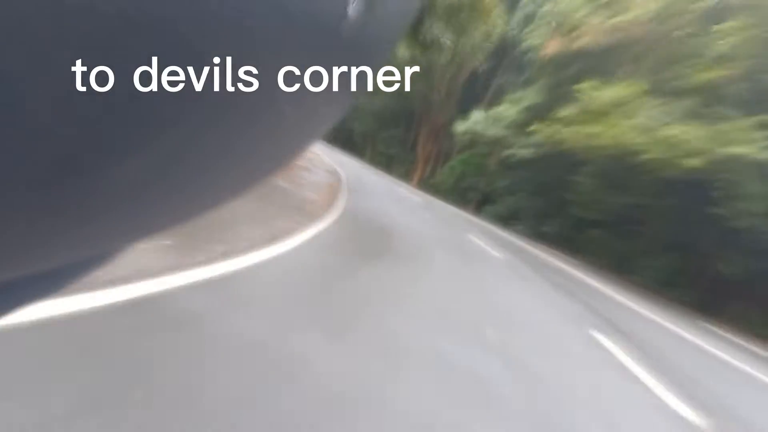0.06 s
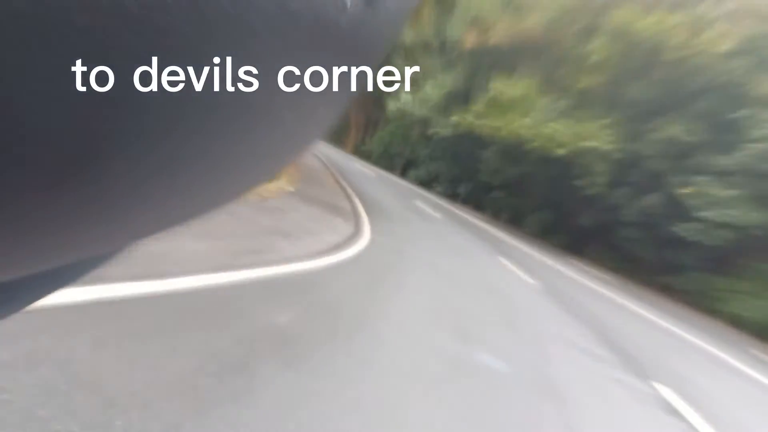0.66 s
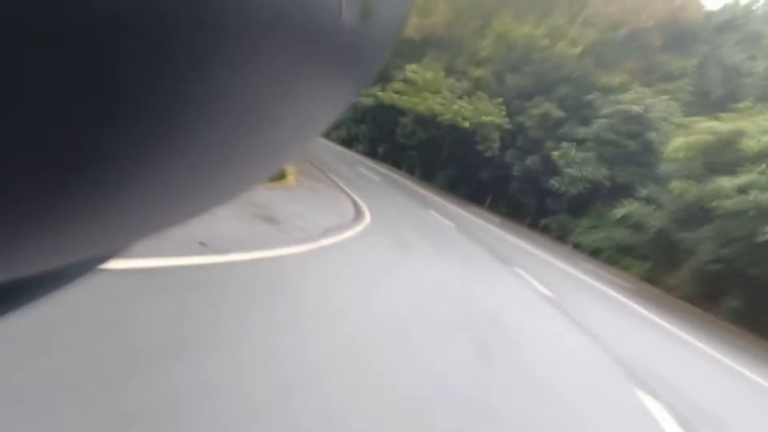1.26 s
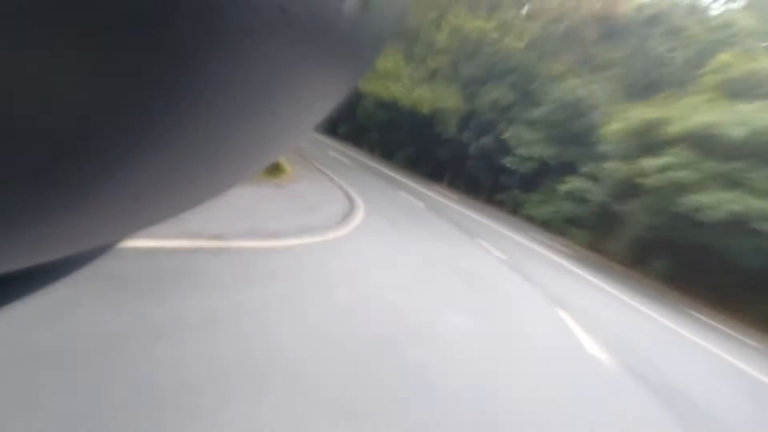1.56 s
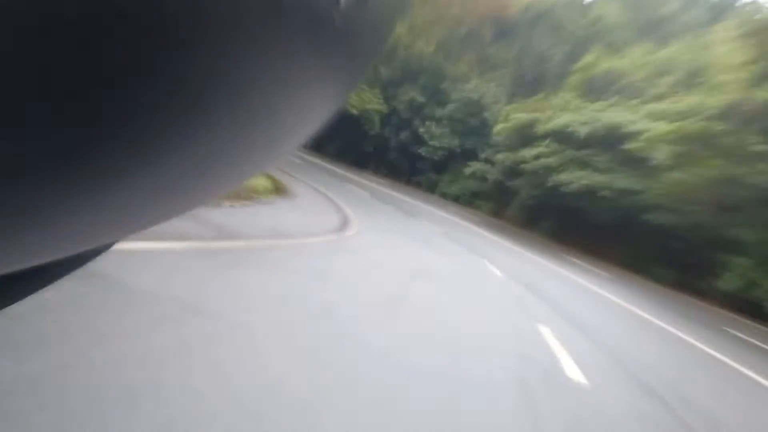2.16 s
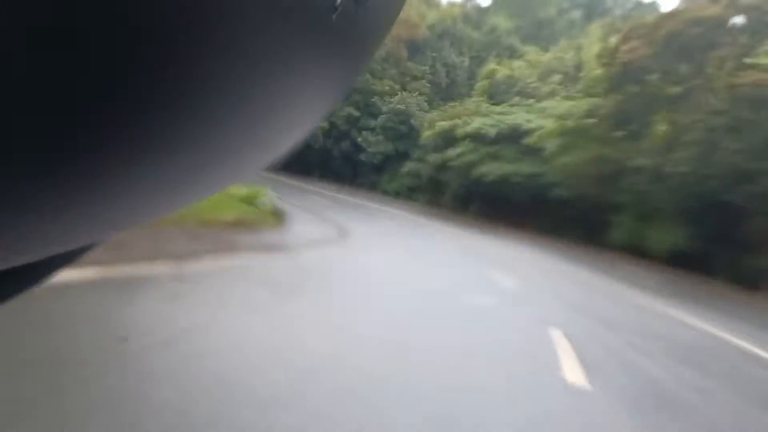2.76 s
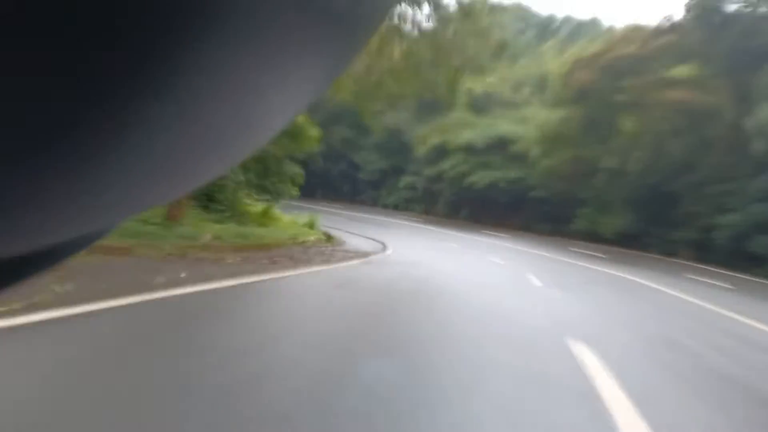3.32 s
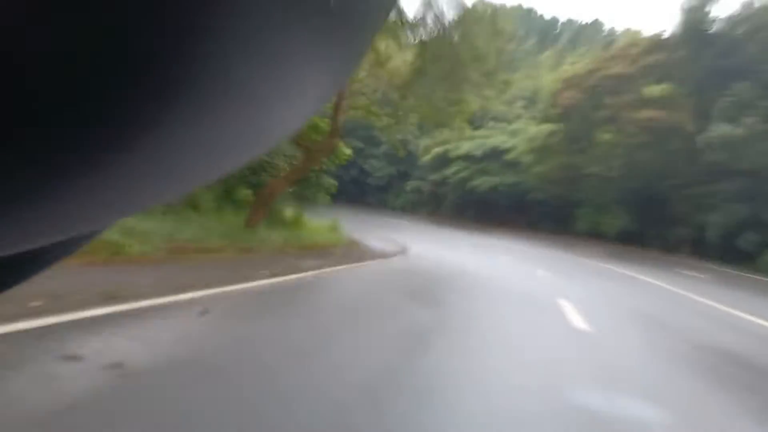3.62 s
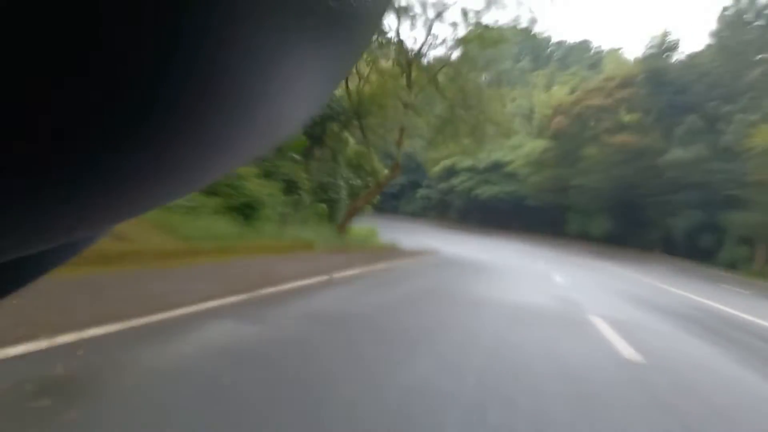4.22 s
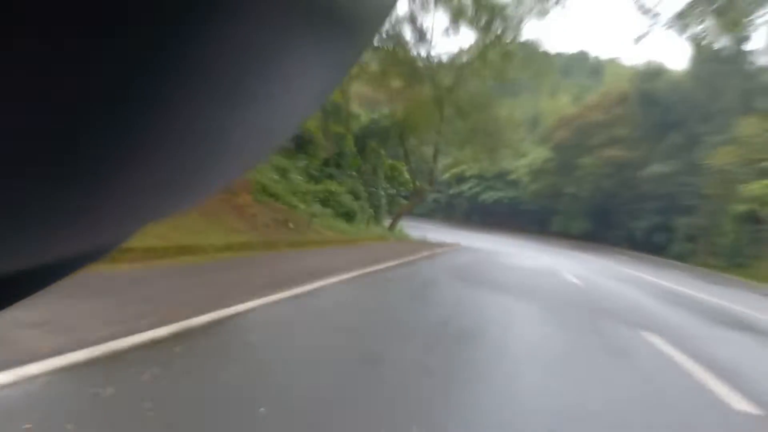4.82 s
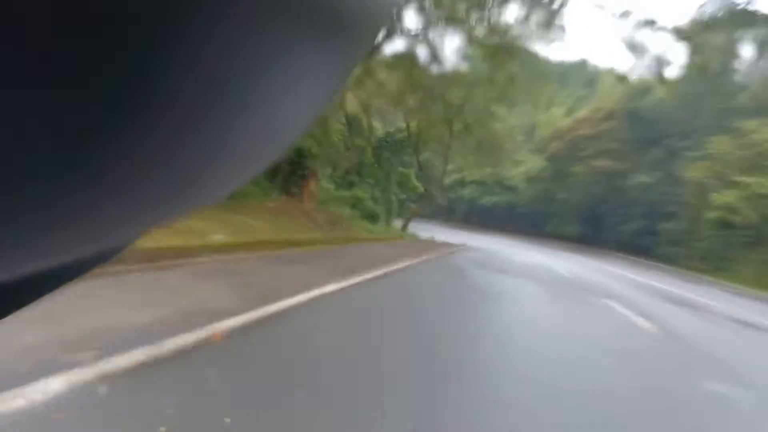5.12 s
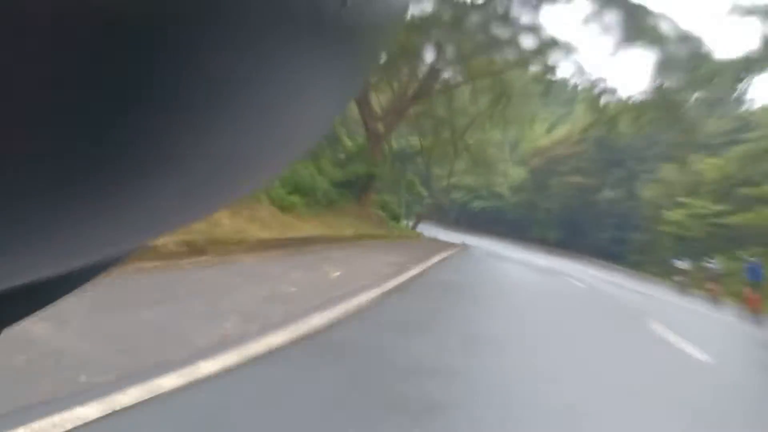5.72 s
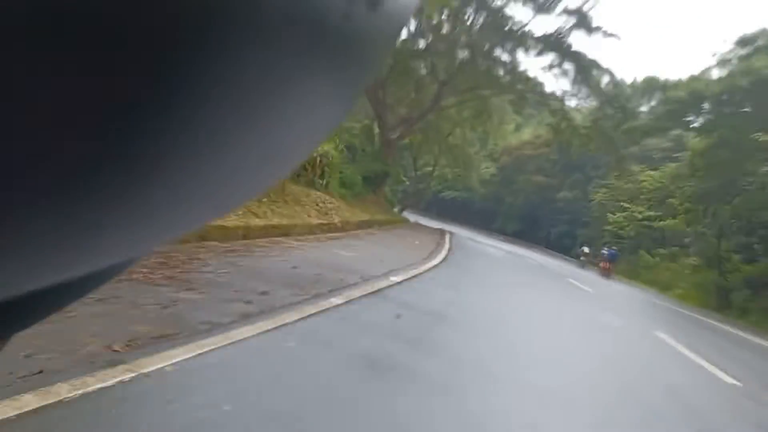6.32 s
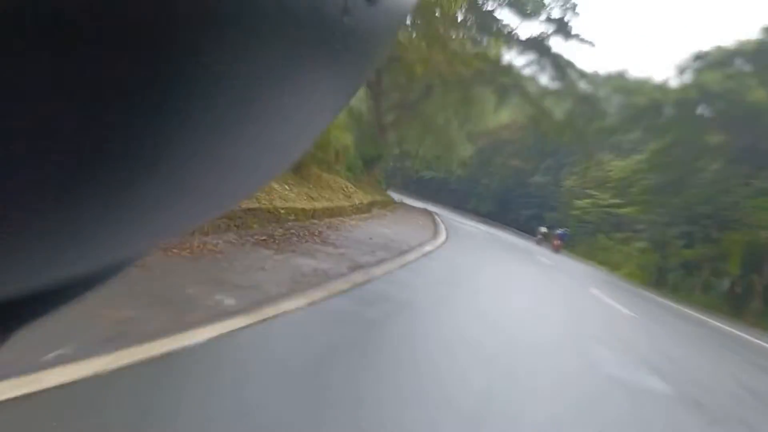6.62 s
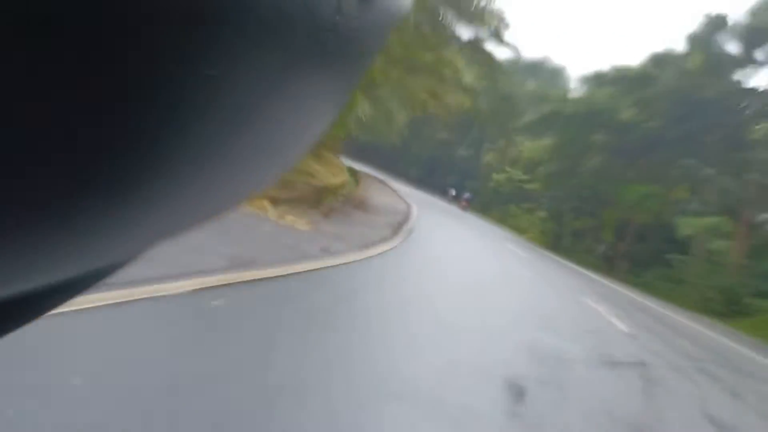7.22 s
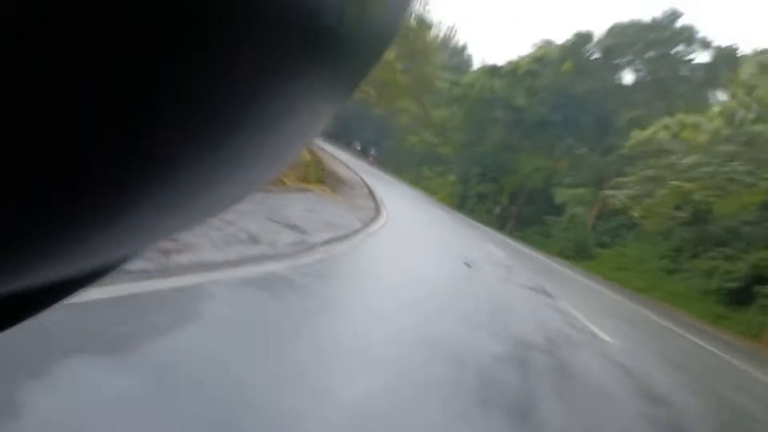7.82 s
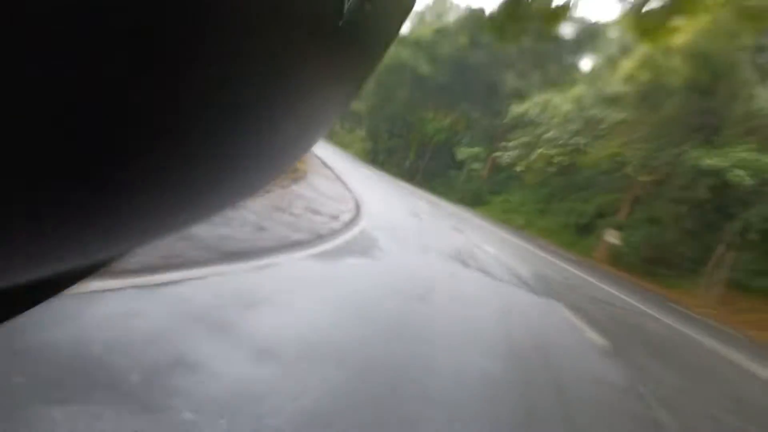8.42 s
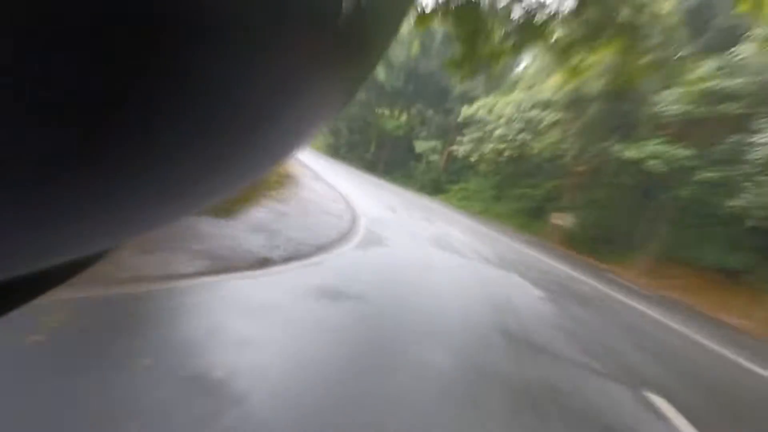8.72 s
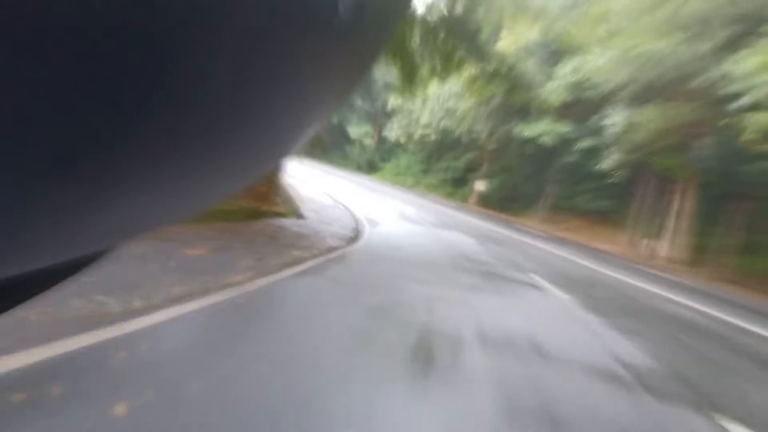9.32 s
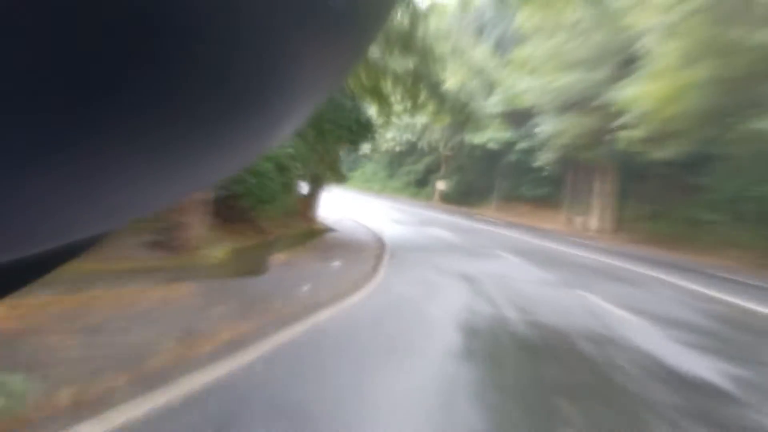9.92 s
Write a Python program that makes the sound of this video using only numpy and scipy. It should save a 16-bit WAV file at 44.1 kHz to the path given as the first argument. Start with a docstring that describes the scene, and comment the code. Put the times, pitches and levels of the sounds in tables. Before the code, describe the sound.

Gusting wind thumps and sputters on the microphone of a moving motorcycle, over a faint engine drone, chain whir and wet tyre hiss.

```python
"""Gusting wind thumps and sputters on two microphone ports, low on a motorcycle in wet bends.
Turbulent air buffets each port, rushes over the bodywork and rings a hollow of the housing;
single eddies slap, blurt and spit. Under it the exhaust drones on multiples of the engine cycle,
chain links whir on the sprocket and the tyres hiss with spray. Late on the revs drop briefly."""
import sys
import numpy as np
from scipy import signal
from scipy.fft import rfft, irfft, next_fast_len
from scipy.io import wavfile
from scipy.ndimage import uniform_filter1d

SR = 44100
rng = np.random.default_rng(int(sys.argv[2]) if len(sys.argv) > 2 else 0)


def waveform_to_disk(signal):
    """Save audio, clipped to [-1, 1], as 16-bit WAV at the path in sys.argv[1]."""
    frames = np.transpose(np.atleast_2d(signal))
    scaled = np.clip(frames, -1, 1) * 32767
    samples = np.round(scaled).astype(np.int16)
    wavfile.write(sys.argv[1], SR, samples)


N = 439677

# Spectral shapes: freq_hz, density_db
BUFFET_SPECTRUM = [(20, -6), (45, -17), (72, -6), (118, 0.5), (178, -3.5), (235, -1.5), (300, -4),
                   (420, -12.5), (800, -12), (3000, -86.5)]
SPUTTER_SPECTRUM = [(150, -12), (300, -8), (600, -2), (930, -4), (1130, 1.5), (1340, -0.5), (1600, -6),
                    (2200, -12), (3200, -19), (10000, -50)]
RUSH_SPECTRUM = [(100, -35), (280, 5.5), (600, -2), (950, -3.5), (1170, 5.5), (1480, -0.5), (1720, 2),
                 (2500, -4.5), (3700, -10), (5000, -10.5), (8000, -50)]
CHAIN_SPECTRUM = [(2500, -28), (4000, -10.5), (5800, -7.5), (6900, -9), (7550, -16), (8100, -3),
                  (8750, -18.5), (9200, -25), (11500, -24)]
SPRAY_SPECTRUM = [(1500, -8), (3300, 10), (5500, 0.5), (7000, 5.5), (8000, -3.5), (10200, 0), (11200, 5),
                  (14400, 2), (15500, -9.5)]
SLAP_SPECTRUM = [(150, -15), (350, -12), (700, -7.5), (1150, 4), (1380, 2.5), (1700, -6), (2400, -12.5),
                 (3500, -17), (10000, -51)]
SPIT_SPECTRUM = [(600, -18), (1500, 5), (2500, -4), (3600, -6), (8000, -40)]
# Deepest band of the buffeting: time_s, gain_db
DEEP_GAIN = [(0, 0), (1.2, 0), (2.4, 1), (3.3, -0.5), (4.6, 5.5), (5.8, -0.5), (6.6, 3.5), (8.5, 0),
             (9.97, 3)]
# Boom band of the buffeting: time_s, gain_db
BOOM_GAIN = [(0, -2.5), (1.2, -2), (2.6, 0.5), (4, -1.5), (5.5, 2.5), (6.6, 3), (7.5, -0.5), (8.6, 2.5),
             (9.97, -0.5)]
# Puffs of air on the ports: peak_s, buffet_rise_db, sputter_rise_db
PUFFS = [(0.207, 16, 7.5), (0.297, 11, 4), (0.327, 13.5, 4), (0.547, 10, 6), (0.591, 11, 6.5),
         (0.661, 6, 6), (0.74, 12.5, 6), (0.827, 12.5, 1), (0.861, 15.5, 5.5), (0.948, 5, 4),
         (1.004, 12, 6.5), (1.034, 10.0, 3), (1.229, 13, 6), (1.282, 12, 7), (1.341, 9.5, 3),
         (1.414, 13, 1), (1.487, 10, 5.5), (1.543, 4, 7.5), (1.606, 13.5, 12), (1.733, 11.5, 10.5),
         (1.986, 10.5, 3.5), (2.158, 2, 9), (2.36, 12, 6), (2.411, 10.5, 2), (2.576, 4, 7.5),
         (2.693, 11.5, 7.5), (2.789, 12, 5), (2.867, 2, 8), (2.947, 11, 4.5), (2.987, 6, 5.5),
         (3.028, 6, -2), (3.108, 8.5, 2), (3.251, 10.5, -2), (3.48, 7.5, 9.5), (3.542, 7, 4.5),
         (3.617, 12.5, 9.5), (3.651, 16.5, 8), (3.716, 5, 5.5), (3.957, 6, 9.5), (3.999, 10.5, 6),
         (4.028, 12.5, 11.5), (4.056, 8, 9), (4.097, 10.5, 8.5), (4.145, 9, 6.5), (4.214, 13, 8.5),
         (4.314, 13, 0), (4.536, 9, 0), (4.569, 12.5, 4), (4.766, 11.5, -3), (4.894, 12.5, 4),
         (5.026, 12, 1), (5.07, 1, 7.5), (5.106, 11, 6), (5.147, 12, 4.5), (5.23, 12, 2), (5.268, 13, 3),
         (5.383, 7, 5), (5.44, 8.5, 4), (5.475, 8, 6), (5.527, 14, 9), (5.559, 13.5, 7.5), (5.611, 15, 2),
         (5.661, 10, 7.5), (5.728, 10.5, 7.5), (5.854, 12, -1), (5.886, 11, 2), (6.02, 9, 3),
         (6.296, 11.5, 8.5), (6.338, 12, 2), (6.372, 13.5, 7), (6.472, 7, -1), (6.538, 1, 8),
         (6.572, 9.5, 2), (6.658, 10, 2), (6.752, -4, 8.5), (6.841, 12, 6), (6.916, 13.5, 13.5),
         (7.033, 7, 3), (7.301, 13.5, 7.5), (7.343, 14.5, 6.5), (7.45, 14.5, -1), (7.483, 13, 5),
         (7.529, 2, 7), (7.565, 12, 1.0), (7.691, 15, 4.5), (7.787, 9, 8), (7.881, 3.0, 4), (7.945, -3, 0),
         (7.986, 13, 11.5), (8.114, 6, 8), (8.262, 12, 7), (8.326, 8, -5), (8.471, 8, 8.5),
         (8.512, 15.5, 8), (8.589, 15.5, 5.5), (8.643, 9, 3), (8.675, 9, 6.5), (8.71, 12, 6.5),
         (8.837, 8, 7), (8.864, 13, 0), (8.925, 6, 4.5), (8.954, 8, 8.5), (9.352, 6, 6.5), (9.401, 8, 8.5),
         (9.496, 17, 7.5), (9.553, 18, 7), (9.612, 18, 4), (9.65, 7, 5), (9.703, 8, 5), (9.828, 9, 4)]
# Lulls in the wind: centre_s, length_s, drop_db
LULLS = [(0.484, 0.027, 13), (4.119, .03, 9), (4.665, 0.081, 5), (6.265, .03, 10), (7.112, .07, 4.5),
         (7.405, 0.027, 5)]
# Ringing hollow of the housing: time_s, level_db, pitch_hz
HOLLOW_TRACK = [(0, -36.5, 1275), (1.5, -35, 1275), (2.6, -31.5, 1270), (3.5, -36.5, 1303),
                (4.4, -38, 1303), (5.8, -46, 1267), (7, -36.5, 1333), (8.4, -37, 1305), (9.97, -34, 1242)]
# Loudness of chain, spray and rush with road speed: time_s, relative_db
RIDE_LEVEL = [(0, -37), (1, -38.5), (3, -36.5), (5, -37), (6.2, -39.5), (6.9, -41), (8.1, -41), (9.2, -39),
              (9.97, -37)]
# Engine speed: time_s, cycle_hz
ENGINE_SPEED = [(0.0, 42.7), (1.0, 37.5), (2.5, 35.4), (3.5, 43.6), (4.5, 37.4), (5.5, 48.6), (6.5, 34),
                (7.5, 37.78), (8.5, 43), (9.2, 29.3), (9.97, 40.7)]
# Exhaust partials: cycle_multiple, level_db, pan_db (left minus right)
EXHAUST_ORDERS = [(2, -50, -2), (4, -43, -15), (5, -46, -13), (6, -43, -2), (8, -43, -6), (9, -47, 9)]
# Chain and sprocket modes: freq_hz, width_hz, relative_db, left_lead_rad
STEEL_MODES = [(4305, 99, -1.5, -1.7), (4670, 110, -1.5, -2.5), (5276, 294, 2.5, -1.45),
               (6570, 80, 0, -2.5), (6880, 80, 0, -2), (8396, 67, 3, -2.5), (10860, 64, -1.5, -4.5),
               (10750, 60, -2, 3), (13390, 220, -4.5, 0.5)]
# Brief dips in chain and spray: centre_s, drop_db
HISS_DIPS = [(.98, 3.5), (1.55, 3), (3.99, 5), (5.8, 3.5), (7.08, 3.5), (9.9, 6)]
# Slaps of air on the housing: start_s, relative_db, pan_db
SLAPS = [(0.467, -24, -12), (1.262, -23.5, 11), (1.731, -20.5, 3), (2.294, -23, -3), (2.671, -23, -1),
         (3.614, -17.5, -3), (4.565, -21, 10), (4.743, -22.5, 9), (4.891, -22.5, 2), (5.103, -20.5, -7),
         (6.157, -26, -1), (6.24, -31, 12), (6.289, -25, 2), (6.602, -23.5, 8), (6.658, -27, 10),
         (6.916, -19.5, 8), (7.029, -21, 9), (7.422, -25, 9), (7.525, -22.5, 13), (7.682, -20, 7),
         (7.977, -24, 7), (8.204, -27, 9), (8.423, -24, 16), (8.919, -24, 8), (9.002, -22.5, 9),
         (9.647, -21, 0), (9.881, -23, 8)]
# Large vortices over the ports: centre_s, peak_db, pitch_hz, pan_db
VORTICES = [(3.25, -18, 230, 2), (3.645, -13.5, 145, -3), (4.037, -20, 550, 3), (5.53, -15, 180, 2),
            (5.57, -19, 340, 2), (5.662, -18, 230, 3), (6.025, -18, 159, -2), (6.292, -16.5, 1110, 4),
            (6.472, -16.5, 124, -5), (7.698, -17, 139, -1), (8.33, -20, 105, -2), (8.59, -18, 202, 2),
            (8.642, -18, 190, -2), (8.675, -20, 520, 3), (9.649, -14, 1120, -3)]
# Bright spits of air and spray: start_s, peak_db, pan_db
SPITS = [(5.003, -20, 2), (6.685, -25, 12), (7.215, -19.5, 5), (7.54, -23, 5), (7.879, -18, 8),
         (7.937, -19, 4), (8.404, -18, 8), (9.293, -18.5, 15)]

TIME_S = np.arange(N) / SR
WIND_EASE_START_S = 4.94
LINKS_PER_CYCLE, LINKS_PER_LAP, LINKS_PER_WHEEL_TURN = 7.524, 104, 35


def amp(db):
    """Decibels to gain."""
    return 10 ** (np.asarray(db) / 20)


def unit(x):
    """Scale to rms 1."""
    return x / np.sqrt(np.mean(x ** 2) + 1e-20)


def pan(pan_db):
    """Left and right gains of mean power 1."""
    return unit(amp([[pan_db / 2], [-pan_db / 2]]))


def curves(rows):
    """One value per sample for each column after time_s."""
    times_s, *columns = np.transpose(rows)
    return [np.interp(TIME_S, times_s, column) for column in columns]


def wobble(rate_hz):
    """Smooth random curve with knots at rate_hz."""
    fine = signal.resample_poly(rng.standard_normal(int(N * rate_hz / SR) + 4), 8, 1)
    return np.interp(TIME_S * 8 * rate_hz, np.arange(len(fine)), fine)


def eddies(rate_hz):
    """Random swings of the flow, separate at each port."""
    return np.array([wobble(rate_hz), wobble(rate_hz)])


def shape(spectrum, hz):
    """Gain of a spectrum, interpolated in log frequency."""
    freq_hz, db = np.transpose(spectrum)
    return amp(np.interp(np.log(hz + 1), np.log(freq_hz), db))


def filtered(x, response):
    """Apply a complex frequency response."""
    size = next_fast_len(N + 8192)
    return irfft(rfft(x, size) * response(np.fft.rfftfreq(size, 1 / SR)), size)[..., :N]


def resonance(hz, centre_hz, width_hz):
    """Response of one damped mode."""
    return 1j * hz * width_hz / (centre_hz ** 2 - hz ** 2 + 1j * hz * width_hz)


def minimum_phase(gain):
    """Causal response with this gain."""
    cepstrum = irfft(np.log(gain))
    half = len(cepstrum) // 2
    cepstrum[1:half] *= 2
    cepstrum[half + 1:] = 0
    return np.exp(rfft(cepstrum))


def read_at(x, positions):
    """Both channels at fractional sample positions."""
    return np.array([np.interp(positions, np.arange(N), side) for side in x])


def wavering(x, shift_hz, rate_hz):
    """Sway all frequencies up and down together."""
    sway_rad = 2 * np.pi * np.cumsum(shift_hz * wobble(rate_hz)) / SR
    return np.real(signal.hilbert(x, next_fast_len(N))[:, :N] * np.exp(1j * sway_rad))


def gurgling(depth_db):
    """Stereo noise whose narrow bands swell and sink independently."""
    bands = signal.stft(rng.standard_normal((2, N)), nperseg=1024)[2]
    swell = rng.standard_normal(bands.shape[1:])
    swell = uniform_filter1d(uniform_filter1d(swell, 3, axis=0), 3, axis=1)
    return signal.istft(bands * amp(depth_db * unit(swell)), nperseg=1024)[1][:, :N]


def road_echo(x, gain):
    """Add the wet road's reflection, its path moving with the suspension; rms 1."""
    delay_s = 0.00302 * (1 + 0.019 * wobble(3.7))
    return unit(x + gain * read_at(x, np.arange(N) - delay_s * SR))


def turbulence(flow_db, spectrum, lowest_hz, swing_db):
    """One eddy size per octave; smaller eddies come and go faster."""
    size = next_fast_len(N, real=True)
    hz = np.fft.rfftfreq(size, 1 / SR)
    total = 0
    for centre_hz in lowest_hz * 2 ** np.arange(4):
        drive_db = flow_db + swing_db * eddies(0.3 * centre_hz)
        strength = amp(21.2 * np.tanh(drive_db / 13))  # no eddy outruns the airflow
        octave = np.exp(-np.log2((hz + 1) / centre_hz) ** 2)
        total += octave * rfft(strength * rng.standard_normal((2, N)), size)
    return unit(irfft(total * minimum_phase(shape(spectrum, hz)))[:, :N])


def buffeting(gust_db, swing_db, deep_edge_hz=130):
    """Large eddies thump on the ports; the deep and boom bands drift in level."""
    thumps = turbulence(gust_db, BUFFET_SPECTRUM, lowest_hz=55, swing_db=swing_db)
    deep = filtered(thumps, lambda hz: 1 / (1 + (hz / deep_edge_hz) ** 4))
    boom = filtered(thumps, lambda hz: resonance(hz, centre_hz=215, width_hz=49))
    return thumps + (amp(curves(DEEP_GAIN)[0]) - 1) * deep + (amp(curves(BOOM_GAIN)[0]) - 1) * boom


def puffs_and_lulls(rise_s=0.014, fall_s=0.018, lull_edge_s=0.022):
    """Surges and gaps in the flow: puff envelope (0-1), buffet_lift_db, sputter_lift_db."""
    envelope, lift_db = np.zeros(N), np.zeros((2, N))
    for peak_s, *rises_db in PUFFS:
        peak = round(peak_s * SR)
        near = slice(max(peak - SR // 10, 0), peak + SR // 10)
        age_s = TIME_S[near] - peak_s
        swell = np.exp(-abs(age_s / np.where(age_s < 0, rise_s, fall_s)) ** 3)
        envelope[near] = np.maximum(envelope[near], swell)
        lift_db[:, near] = np.maximum(lift_db[:, near], np.outer(rises_db, swell))
    for centre_s, length_s, drop_db in LULLS:
        inside_s = length_s / 2 - abs(TIME_S - centre_s)
        lift_db -= drop_db * np.clip(0.5 + inside_s / lull_edge_s, 0, 1)
    return envelope, *lift_db


def wind(base_db=-31.5, buffet_ease_db_per_s=0.8, sputter_ease_db_per_s=0.32, port_leak=0.068):
    """Ragged turbulence, largely separate at each port, over the rush and the hollow."""
    puff, buffet_lift_db, sputter_lift_db = puffs_and_lulls()
    unswept = 1 - 0.86 * puff  # a puff sweeps lesser gusts aside
    gust_db = unswept * (2 * eddies(68) + 1.6 * wobble(60))
    flurry_db = 0.65 * gust_db + unswept * 2.5 * wobble(90) + 2.03 * eddies(300)  # small eddies
    buffet = buffeting(gust_db, swing_db=3 * unswept)
    sputter = turbulence(flurry_db, SPUTTER_SPECTRUM, lowest_hz=350, swing_db=2.9)
    eased_s = np.maximum(TIME_S - WIND_EASE_START_S, 0)
    buffet *= amp(base_db + buffet_lift_db - buffet_ease_db_per_s * eased_s)
    sputter *= amp(base_db + sputter_lift_db - sputter_ease_db_per_s * eased_s)
    ports = pan(-0.56) * (buffet + vortices()) + pan(0.82) * (sputter + slaps() + spits())
    flow_db = flurry_db + sputter_lift_db
    return ports + port_leak * ports[::-1] + rush(flow_db) + hollow(flow_db)


def rush(flow_db, base_db=-32):
    """Air streams over the bodywork, louder with speed."""
    stream = unit(filtered(gurgling(depth_db=3.5), lambda hz: shape(RUSH_SPECTRUM, hz)))
    ride_db, = curves(RIDE_LEVEL)
    level_db = base_db + 0.4 * (ride_db - ride_db.mean()) + 0.13 * flow_db
    return amp(level_db) * road_echo(stream, gain=0.045)


def hollow(flow_db, width_hz=115):
    """Air blows across a hollow of the housing; the ring flutters and drifts in pitch."""
    level_db, pitch_hz = curves(HOLLOW_TRACK)
    mean_hz = pitch_hz.mean()
    blowing = rng.standard_normal((2, N)) * amp(2.4 * eddies(30))
    ring = unit(filtered(blowing, lambda hz: resonance(hz, mean_hz, width_hz) ** 2))
    return amp(level_db + 0.08 * flow_db) * read_at(ring, np.cumsum(pitch_hz / mean_hz))


def engine(cycles, waver_db=2, drift_rad=0.29):
    """The exhaust drones on multiples of the firing cycle, each wavering in the moving air."""
    drone = np.zeros((2, N))
    for order, level_db, pan_db in EXHAUST_ORDERS:
        phase_rad = 2 * np.pi * order * cycles + drift_rad * wobble(13)
        drone += pan(pan_db) * amp(level_db + waver_db * wobble(6)) * np.sin(phase_rad)
    return drone


def chain(cycles, left_lag_s=62e-6, shimmer_db=2, mode_groups=3):
    """Links strike the sprocket, harder at each firing, and set the steel ringing."""
    strikes = 1 + 0.5 * np.cos(2 * np.pi * LINKS_PER_CYCLE * cycles)
    tug = 1 + 0.17 * np.cos(2 * np.pi * cycles)
    force = strikes * tug * amp(1.1 * wobble(90))
    split = np.array([[0.5j], [-0.5j]])  # half of a phase lead to each side

    def rattle(hz):
        return shape(CHAIN_SPECTRUM, hz) * np.exp(-split * 2 * np.pi * hz * left_lag_s)

    clatter = filtered(force * rng.standard_normal(N), rattle)
    for group in range(mode_groups):  # the swaying chain feeds neighbouring modes unevenly
        drive = amp(shimmer_db * wobble(28)) * force * rng.standard_normal(N)
        ring = filtered(drive, lambda hz: sum(
            amp(db) * resonance(hz, freq_hz, width_hz) ** 2 * np.exp(split * lead_rad)
            for freq_hz, width_hz, db, lead_rad in STEEL_MODES[group::mode_groups]))
        clatter += wavering(ring, shift_hz=27.92, rate_hz=14)
    return pan(2) * unit(clatter)


def spray(relative_db=-2, splash_db=1.13, grain_db=2):
    """Tyres tear up uneven water: a dense, grainy, gurgling hiss."""
    level_db = relative_db + splash_db * wobble(40)
    droplets = gurgling(depth_db=2) * amp(grain_db * eddies(900))
    return amp(level_db) * unit(filtered(droplets, lambda hz: shape(SPRAY_SPECTRUM, hz)))


def running_gear(cycles, gain_db=4.5, dip_half_width_s=0.033):
    """Chain and spray swell with each chain lap and wheel turn, flutter and dip briefly."""
    links = LINKS_PER_CYCLE * cycles
    lap_db = 0.5 * np.sin(2 * np.pi * links / LINKS_PER_LAP)
    wheel_db = 0.85 * np.sin(2 * np.pi * links / LINKS_PER_WHEEL_TURN + wobble(2.045))
    flutter_db = 1.68 * np.tanh(wobble(26) + wobble(80))
    level_db = curves(RIDE_LEVEL)[0] + gain_db + lap_db + wheel_db + flutter_db
    for centre_s, drop_db in HISS_DIPS:
        level_db -= drop_db * np.exp(-((TIME_S - centre_s) / dip_half_width_s) ** 2)
    return amp(level_db) * road_echo(spray() + chain(cycles), gain=0.34)


def random_blows(from_s, level_db, count):
    """Small blows, each mostly on one port: rows of start_s, level_db, pan_db."""
    return [(from_s + when * (N / SR - from_s), level_db, 12 * (2 * side - 1))
            for when, side in rng.random((count, 2))]


def blows(rows, spectrum, decay_s):
    """Single eddies hit the ports: coloured noise bursts that swell and die."""
    age_s = np.arange(SR // 10) / SR
    colour = minimum_phase(shape(spectrum, np.fft.rfftfreq(len(age_s), 1 / SR)))
    swell = np.sqrt(age_s / decay_s) * np.exp(-age_s / decay_s)
    out = np.zeros((2, N + len(age_s)))
    for start_s, peak_db, pan_db in rows:
        burst = irfft(rfft(swell * rng.standard_normal((2, len(age_s)))) * colour)
        burst /= abs(burst).max(axis=1, keepdims=True)
        start = round(start_s * SR)
        out[:, start:start + len(age_s)] += amp(peak_db) * pan(pan_db) * burst
    return out[:, :N]


def slaps(gain_db=10):
    """Sharp slaps of air ring the housing, with small ones at random."""
    small = random_blows(from_s=0, level_db=-29.5, count=80)
    return amp(gain_db) * blows([*SLAPS, *small], SLAP_SPECTRUM, decay_s=0.0015)


def vortices(sag_hz_per_s=2700, ragged_rad=0.63, port_spread_rad=0.77):
    """Each vortex shakes the ports for a few uneven cycles: a round, sinking blurt."""
    age_s = np.arange(-SR // 20, SR // 20) / SR
    out = np.zeros((2, N))
    for centre_s, peak_db, pitch_hz, pan_db in VORTICES:
        half_width_s = 0.012 * np.sqrt(150 / pitch_hz)  # higher blurts are shorter
        swell = np.exp(-(age_s / half_width_s) ** 2)
        offset_rad = rng.uniform(0, 2 * np.pi) + port_spread_rad * rng.standard_normal((2, 1))
        jitter_rad = ragged_rad * signal.resample(rng.standard_normal((2, 20)), len(age_s), axis=1)
        sweep_rad = 2 * np.pi * (pitch_hz - sag_hz_per_s * age_s / 2) * age_s
        blurt = swell * np.sin(sweep_rad + offset_rad + jitter_rad)
        start = round((centre_s + age_s[0]) * SR)
        out[:, start:start + len(age_s)] += amp(peak_db) * pan(pan_db) * blurt
    return out


def spits():
    """Bright spits of air and spray once the wind slackens, with lesser ones at random."""
    lesser = random_blows(from_s=WIND_EASE_START_S, level_db=-24, count=20)
    return blows([*SPITS, *lesser], SPIT_SPECTRUM, decay_s=0.0053)


def scene():
    """Wind in front; engine, chain and wet tyres behind."""
    cycles = np.cumsum(curves(ENGINE_SPEED)[0]) / SR
    return wind() + engine(cycles) + running_gear(cycles)


def record(dry):
    """Nothing passes above the device's band limit."""
    limit_hz = 15550
    return filtered(dry, lambda hz: hz < limit_hz)


dry = scene()
out = record(dry)
waveform_to_disk(out)
```